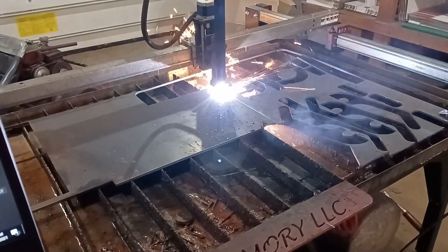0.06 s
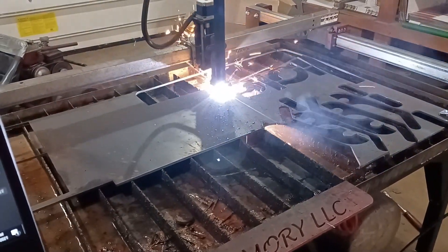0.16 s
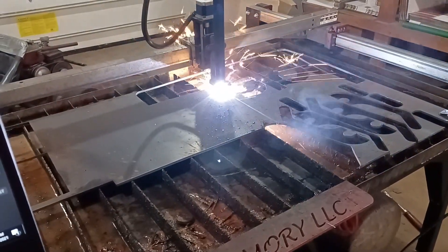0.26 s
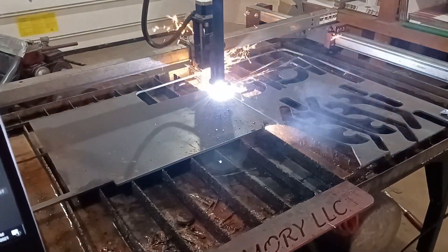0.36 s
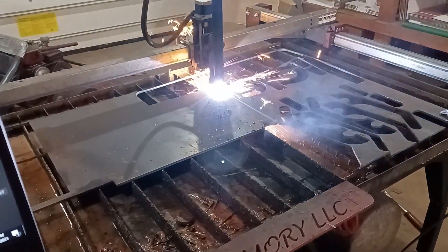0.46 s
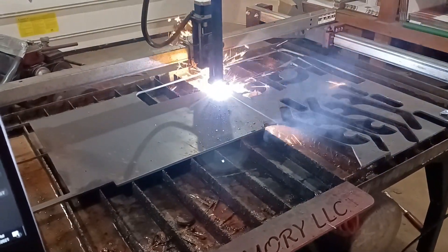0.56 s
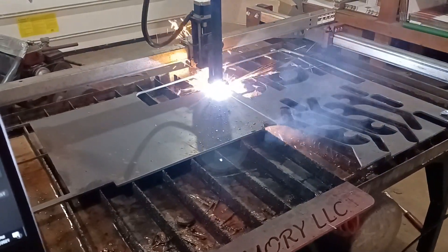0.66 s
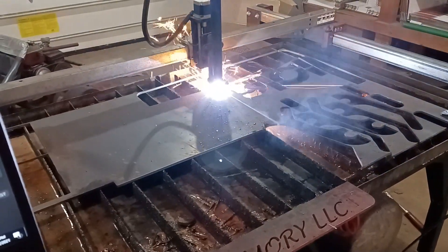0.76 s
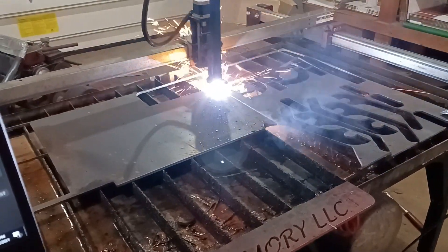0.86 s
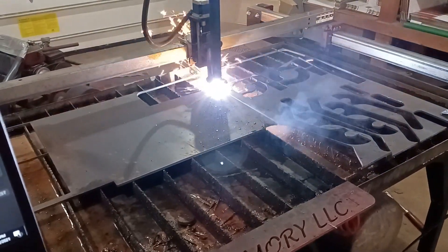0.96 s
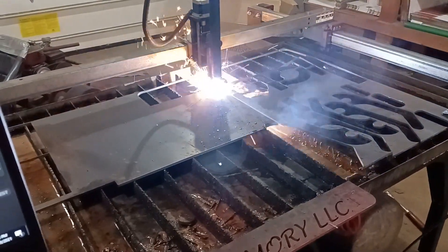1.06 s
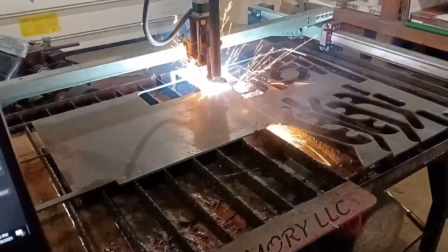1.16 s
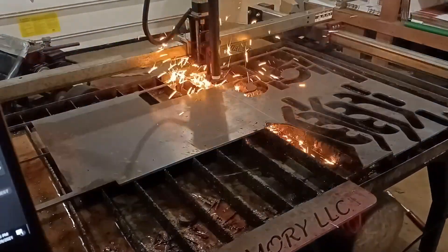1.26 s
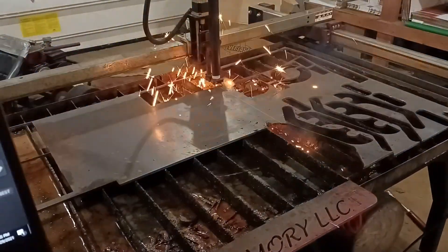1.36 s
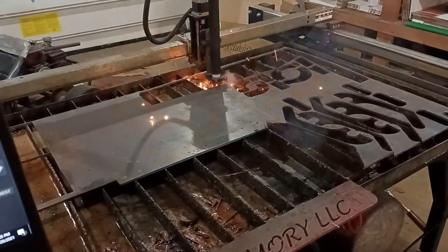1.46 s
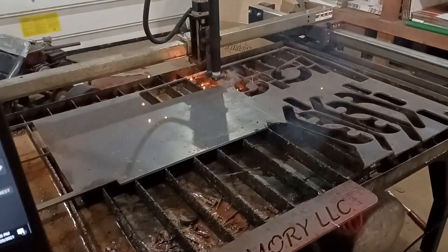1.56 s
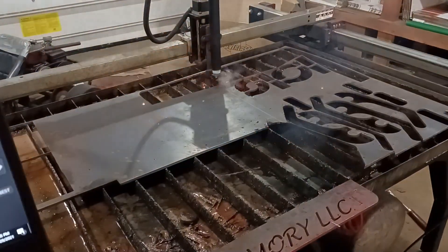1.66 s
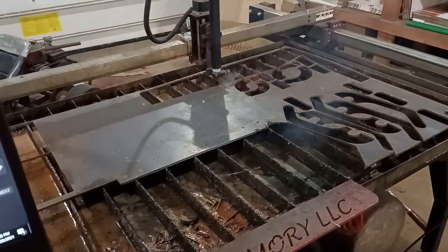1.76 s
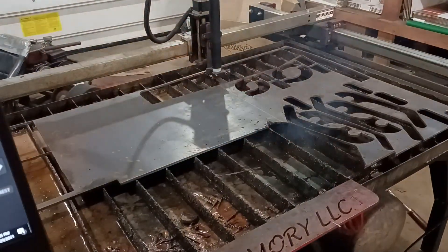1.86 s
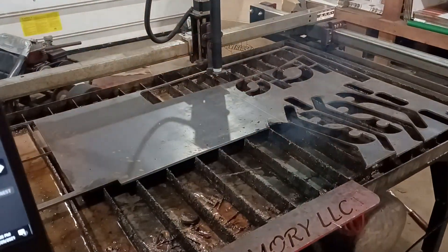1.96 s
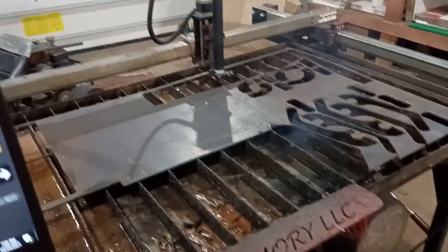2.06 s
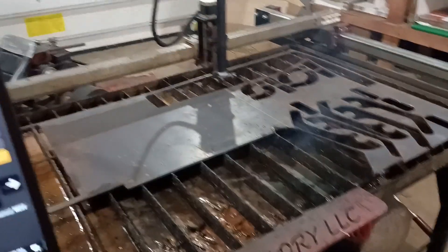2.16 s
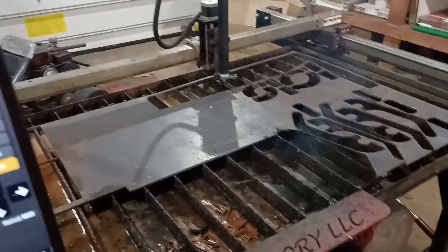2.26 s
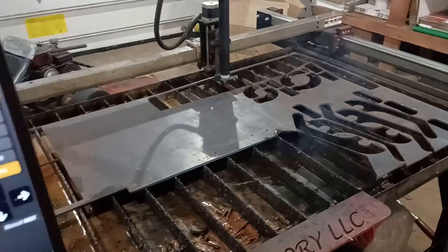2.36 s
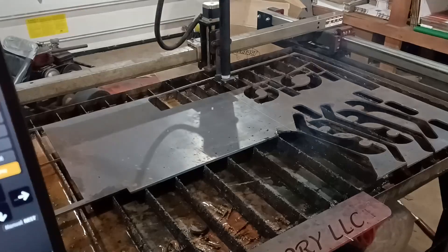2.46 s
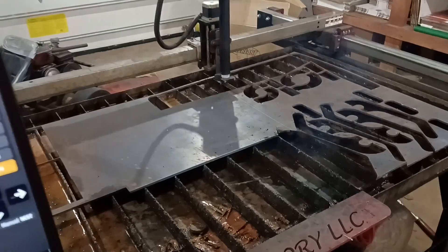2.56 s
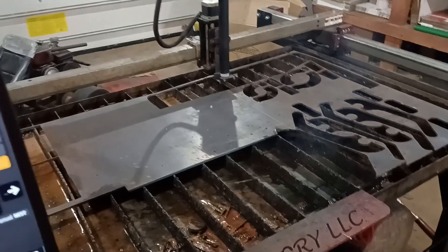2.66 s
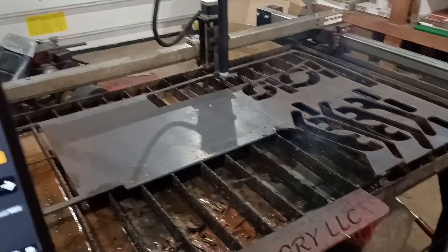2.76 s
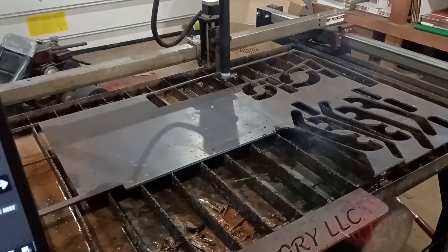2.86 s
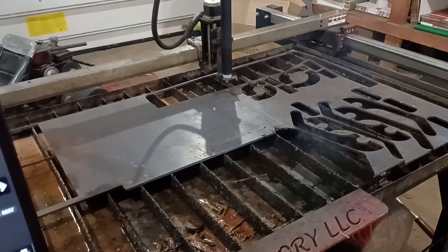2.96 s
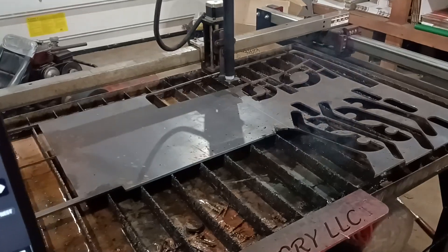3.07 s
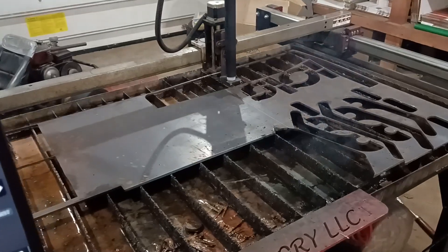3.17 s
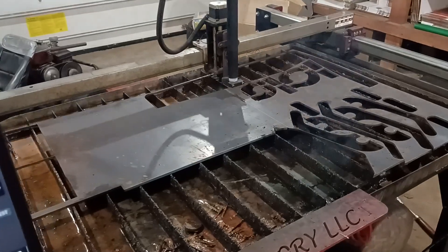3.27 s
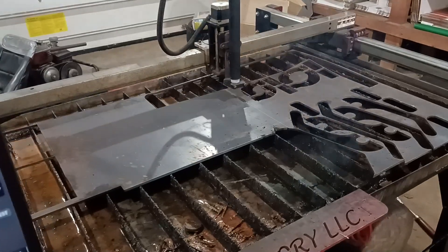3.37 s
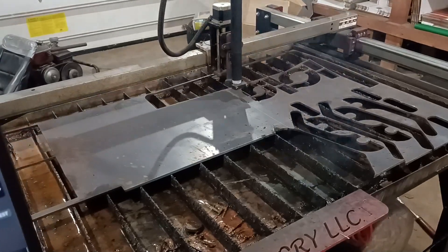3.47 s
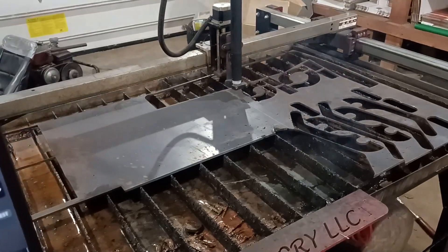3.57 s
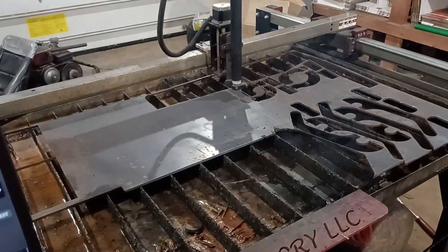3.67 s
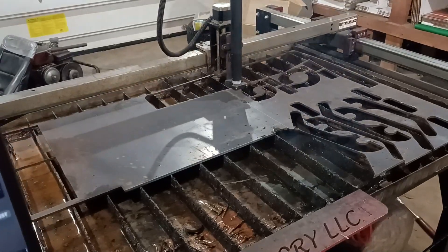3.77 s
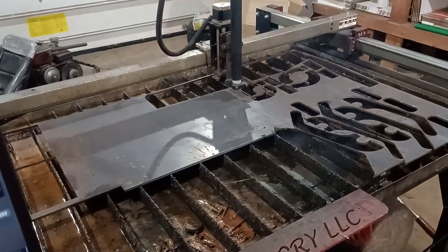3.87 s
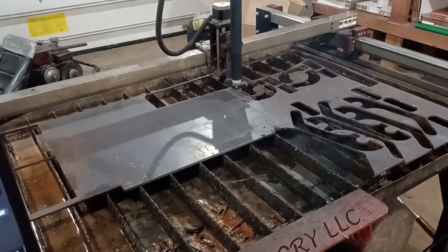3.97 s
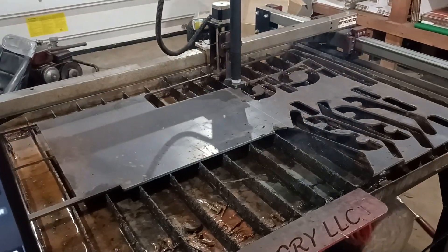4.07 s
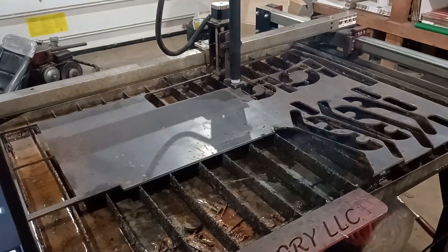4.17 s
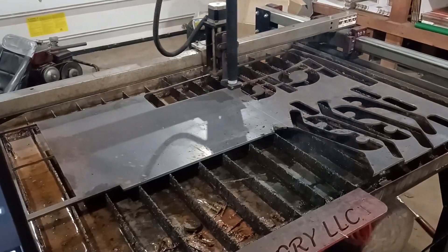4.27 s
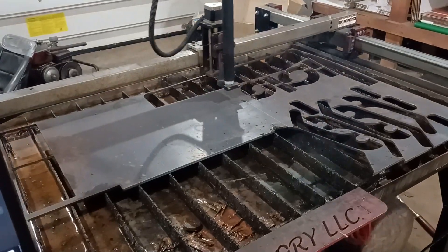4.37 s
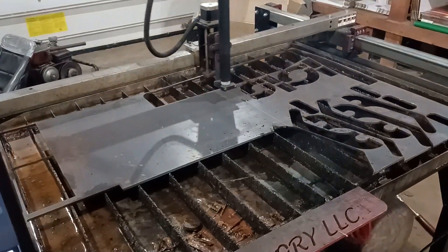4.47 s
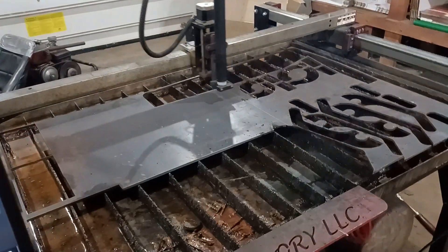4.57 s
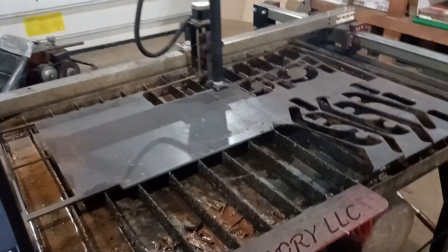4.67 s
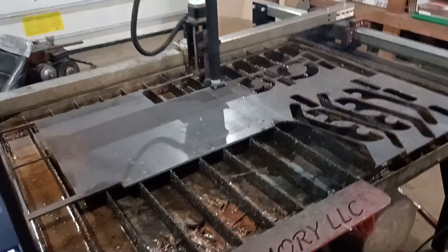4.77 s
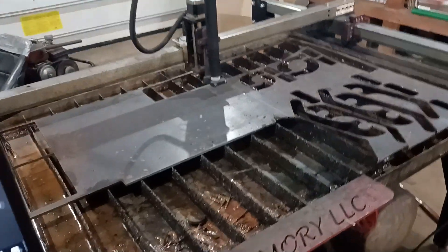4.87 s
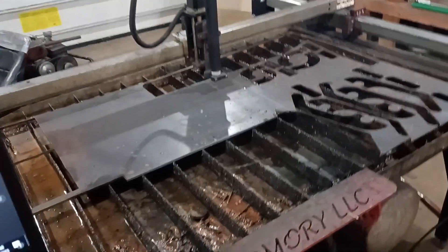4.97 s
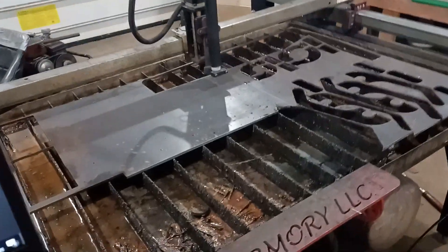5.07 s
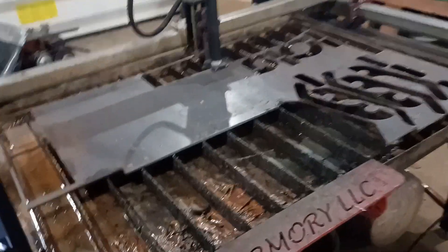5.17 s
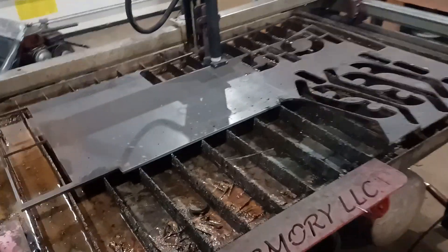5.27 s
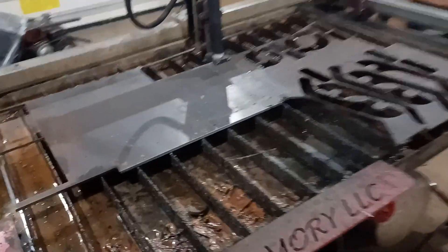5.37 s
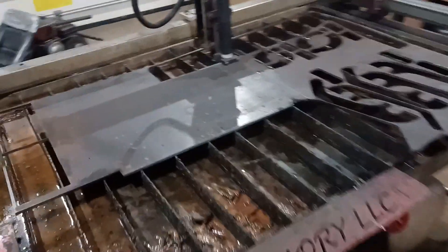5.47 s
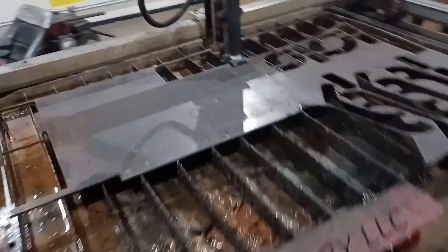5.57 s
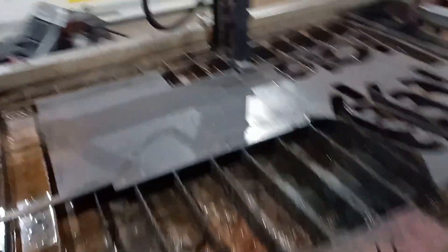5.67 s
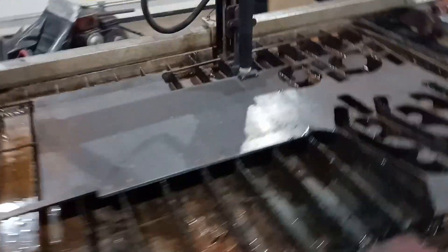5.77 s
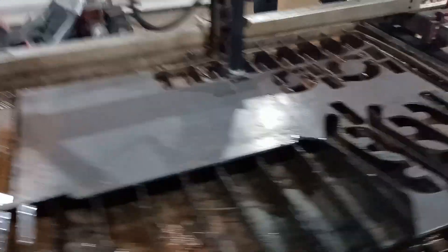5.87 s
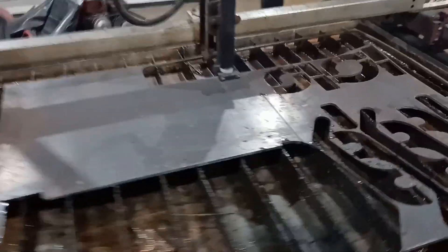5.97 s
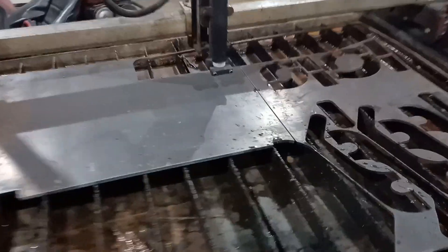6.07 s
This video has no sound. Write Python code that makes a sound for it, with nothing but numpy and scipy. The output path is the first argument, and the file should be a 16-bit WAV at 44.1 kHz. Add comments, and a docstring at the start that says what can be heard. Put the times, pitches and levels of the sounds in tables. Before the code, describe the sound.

In a workshop with a steadily humming, rumbling fan, a nearby plasma cutter gives a loud, harsh hiss that ends in a sputtering pop. A softer rush of air follows, with a faint rasp from the moving carriage and a hollow roar that swells as the jet reaches the steel plate. A motor lowers the torch with a short, throbbing whine, and the hiss turns slightly brighter as the microphone turns.

```python
"""A plasma torch hisses through a steel plate while a workshop fan hums and rumbles throughout.
The arc flares and goes out with a pop. The torch lifts and its carriage rasps as it sets off; cooling
air keeps hissing from the nozzle and roars over the table's open slats. The recorder's gain, turned
down by the loud arc, comes back about a second after it. The jet swells as it meets the plate again,
a whining stepper motor lowers the torch, and at last the listener turns from the fan to the plate."""
import sys
import numpy as np
from scipy import signal
from scipy.fft import rfft, irfft
from scipy.io import wavfile
from scipy.ndimage import uniform_filter1d

SR = 44100
rng = np.random.default_rng(int(sys.argv[2]) if len(sys.argv) > 2 else 0)


def master(y):
    """Save y as 16-bit WAV."""
    cut = np.clip(np.atleast_2d(y).T, -1, 1)
    pcm = np.round(cut * 32767)  # scale
    wavfile.write(sys.argv[1], SR, pcm.astype(np.int16))


N = 269451
TIME = np.arange(N) / SR
FREQS = np.maximum(np.arange(N // 2 + 1) * SR / N, 1)

ARC_OUT_S = 1.189
LIFT_S, LIFT_TAKES_S = 1.34, 0.4   # the torch rises off the cut
SLATS_S, PLATE_S = 1.74, 2.875   # it travels over the open slats, then back onto the plate
LOWER_S, LOWER_TAKES_S = 4.27, 0.31   # it sinks toward the next cut
TURN_S, TURN_TAKES_S = 5.06, 0.96   # the listener turns from the fan toward the plate

# How strong each noise is from low to high pitch: pitch_hz, relative_level_db
FAN_SPECTRUM = [(20, -17), (50, -30), (80, -17), (120, -4), (148, -4.5), (157, 6), (166, -8), (180, -1),
                (220, 2.6), (255, 0), (325, -3.5), (390, -11), (450, -16.5), (560, -8.5), (800, -21),
                (1500, -31)]   # air moved by the fan
HOLLOW_SPECTRUM = [(300, -4), (620, -12.5), (900, 0.1), (1300, -1.5), (1600, 0), (1800, 0.5), (2100, -5),
                   (3000, -8.5), (5000, -13)]   # hollow part of the jet's roar
BRIGHT_SPECTRUM = [(1500, -5.5), (2250, -4), (2540, -1), (2830, -1), (3200, -9), (3600, -8.5), (3830, -3),
                   (4400, -11), (7000, -17)]   # bright part of that roar
RUSH_SPECTRUM = [(500, -5.5), (1000, -13.5), (2000, -19), (3000, -6), (4500, -1), (5800, 2), (7100, 4.5),
                 (7900, -2.5), (9000, -3.5), (11000, -5.5)]   # broad rush of cooling air
SIZZLE_SPECTRUM = [(7000, -67), (9000, -25.5), (10000, -9.5), (11200, 0.5), (12200, 4.5), (14000, 6),
                   (16000, 4.5)]   # fine sizzle at the nozzle
BOUNCE_SPECTRUM = [(4000, -33), (5000, -6.5), (5700, 6), (7200, 7), (7900, -11), (9500, -20), (10600, 1),
                   (12300, 2), (13200, -1), (16000, -3)]   # hiss bouncing off the plate
ARC_SPECTRUM = [(110, -21), (250, -2), (500, -12), (1000, -9.5), (2050, -11), (3100, -5.5), (5000, -4.5),
                (6700, -4), (7900, -10), (9700, -8.5), (10800, -3), (12200, -0.5), (13500, 0.3),
                (16000, -0.1)]   # the cutting jet
GUST_SPECTRUM = [(45, -26), (72, -10), (130, 3), (220, -2.5), (350, 2), (600, -3.5), (1100, -5.5),
                 (1600, -10), (2500, -7), (3300, -35), (5400, -6), (8000, -13.5)]   # dull gust after a pop
# Echoes from nearby surfaces: left_delay_s, right_delay_s, level_db
ROOM_ECHOES = [(.0063, 0.0051, -18.5), (0.0115, 0.016, -14), (0.0178, 0.019, -20.5), (.0313, .0291, -30)]
# How alike the two ears hear a noise (1 is fully alike): pitch_hz, likeness
EAR_LIKENESS = [(30, .6), (70, 0.91), (120, 1), (300, 0.96), (550, 0.47), (1500, 0.45), (3000, 0.58),
                (5000, 0.4), (7000, 0.4), (9500, 0.31), (12500, 0.22), (16000, 0.22)]
# Which side is louder: pitch_hz, left_minus_right_db
EAR_BALANCE = [(100, 0.1), (600, -0.6), (1200, 2), (3000, 0.8), (5000, -2), (7000, 0.8), (9500, -1.5),
               (12300, -4.5), (15000, -0.8)]
# Ringing of the hollow under the plate, between the slats: pitch_hz, width_hz, boost_db
HOLLOW_RESONANCES = [(535, 37, 5), (706, 52, 6.5), (838, 50, 5), (901, 13, 7), (987, 19, 7.5),
                     (1130, 45, 7), (1197, 13, 6), (1417, 41, 5), (1628, 23, 7.5), (1690, 25, 1)]
# The jet crosses an edge of the steel: time_s, swell_db
EDGE_CROSSINGS = [(2.874, 7.5), (4.234, 0.5)]
# Loudness of the nozzle's sizzle over time: time_s, level_db
SIZZLE_LEVELS = [(1.19, -50), (1.4, -34.5), (2.25, -27.5), (2.9, -29), (3.55, -27.5), (4.2, -28),
                 (4.72, -31), (5.1, -29), (5.35, -30.5), (5.68, -27), (5.82, -27), (6.11, -29)]
# The arc flares as the cut breaks through: start_s, step_up_db
ARC_FLARES = [(0.954, 1.85), (1.12, 1.4)]
# The arc sputters and blows out: start_s, crack_db, gust_db
ARC_POPS = [(1.135, -38.5, -33), (1.1927, -10.5, -20.5), (1.2088, -15.5, -31), (1.2415, -21, -24)]
# Notes of the table knocked by a pop: pitch_hz, relative_level_db, fade_s (time to fall 60 dB)
TABLE_NOTES = [(137, -10.5, 0.11), (206, -1, 0.066), (402, -37, .06)]


def from_db(db):
    """Turn decibels into a gain to multiply by."""
    return 10 ** (np.asarray(db) / 20)


def ramp(start_s, takes_s):
    """Go from 0 to 1 at an even pace."""
    return np.clip((TIME - start_s) / max(takes_s, 1 / SR), 0, 1)


def over_freqs(points):
    """Read a table at every frequency, along a musical (log) pitch scale."""
    hz, value = np.transpose(points)
    return np.interp(np.log(FREQS), np.log(hz), value)


def colour(points):
    """Gain per frequency, falling away beyond the ends of the table."""
    skirts = np.minimum(FREQS / points[0][0], 1) * np.minimum(points[-1][0] / FREQS, 1)
    return from_db(over_freqs(points)) * skirts ** 2


def band(pitch_hz, half_width_hz, steepness=2):
    """A hump of height 1 around one pitch."""
    return 1 / (1 + ((FREQS - pitch_hz) / half_width_hz) ** steepness)


def white(count):
    """Spectra of unrelated white noises."""
    return rng.standard_normal((count, len(FREQS))) + 1j * rng.standard_normal((count, len(FREQS)))


def drift(rate_hz):
    """A slow random wobble with a typical size of 1."""
    wobble = irfft(white(count=1)[0] * band(0, rate_hz), N)
    return wobble / np.sqrt(np.mean(wobble ** 2))


def delay(seconds):
    """Multiply a spectrum by this to make its sound arrive later."""
    return np.exp(-2j * np.pi * FREQS * seconds)


def turbulence(gain, lag_s=0):
    """Stereo noise of swirling air, shaped by gain, at a standard level; lag_s delays the right side."""
    shared, spread = white(count=2)
    alike = np.clip(over_freqs(EAR_LIKENESS), -1, 1)
    shared, spread = shared * np.sqrt(1 + alike), spread * np.sqrt(1 - alike)
    noise = irfft(gain * np.array([shared + spread, (shared - spread) * delay(lag_s)]), N)
    return noise / np.std(noise.mean(axis=0))


def workshop():
    """What the room does for each ear: direct sound plus echoes from gantry, floor and walls."""
    echoes = sum(from_db(db) * np.array([delay(left), delay(right)]) for left, right, db in ROOM_ECHOES)
    return (1 + echoes) * from_db(over_freqs(EAR_BALANCE) * np.array([[.5], [-.5]]))


def reverberate(sound, tail_db, fade_s=0.75):
    """Add the workshop's fading wash of echoes."""
    age = TIME[:SR // 2]
    tail = rng.standard_normal((2, len(age))) * from_db(-60 * age / fade_s) * (age > .005)
    tail = tail / np.sqrt(np.sum(tail ** 2, axis=1, keepdims=True))
    return sound + from_db(tail_db) * signal.fftconvolve(sound, tail, axes=1)[:, :N]


def table_hollow():
    """The hollow under the plate boosts the pitches it rings at."""
    return from_db(sum(db * band(hz, width / 2) for hz, width, db in HOLLOW_RESONANCES))


def torch_height():
    """0 down at the plate, 1 at travelling height."""
    return ramp(LIFT_S, LIFT_TAKES_S) - ramp(LOWER_S, LOWER_TAKES_S)


def fan(room, hum_hz=269.8, hum_db=-31.5, octave_db=-32, rumble_db=-37, on_plate_db=1.5, turned_db=-2):
    """The blades hum over a rumble of moving air, which thickens once the jet is on the plate."""
    phase = 2 * np.pi * hum_hz * TIME + 0.041 * drift(rate_hz=5.9)
    tone = np.sqrt(2) * (np.sin(phase) + from_db(octave_db) * np.sin(2 * phase))
    lean_left = from_db([[0.75], [-0.75]])
    hum = tone * from_db(hum_db + .8 * drift(rate_hz=9)) * lean_left
    rumble = turbulence(room * colour(FAN_SPECTRUM))
    rumble *= from_db(rumble_db + on_plate_db * ramp(PLATE_S, 0.18))
    return from_db(turned_db * ramp(TURN_S, TURN_TAKES_S) ** 3) * (hum + rumble)


def carriage(room, level_db=-39):
    """The carriage that carries the torch rasps briefly as it sets off."""
    rasp = turbulence(room * band(pitch_hz=1620, half_width_hz=200, steepness=4))
    return from_db(level_db) * np.sin(np.pi * ramp(start_s=1.52, takes_s=0.73)) * rasp


def stepper(room, start_s=4.3, brake_s=4.785, step_hz=1992, turns_hz=19.6, mount_hz=1990):
    """The lift motor whines at its step rate, throbs with each turn of its screw and brakes to a stop."""
    speed = ramp(start_s, takes_s=.03) - ramp(brake_s, takes_s=.08)
    phase = 2 * np.pi * np.cumsum(step_hz * speed) / SR + .35 * drift(rate_hz=30)
    throb = 1 + 0.59 * np.cos(2 * np.pi * turns_hz * (TIME - 5))
    flutter = from_db(2.2 * drift(rate_hz=30))
    level = from_db(-42 + 3 * ramp(start_s, brake_s - start_s)) * (speed > 0)
    whine = level * throb * flutter * np.sin(phase)
    # the mount rings along at full speed, so the whine drops away as the motor slows
    mount = 1 / (1 + 1j * (FREQS - mount_hz) / 190)
    return reverberate(irfft(rfft(whine) * mount * room, N), tail_db=-6)


def plate_roar(room, hollow_db=-49, bright_db=-45, slats_db=-13, crossing_s=0.046):
    """The jet roars louder the higher the torch: hollow over the slats, brighter on the plate."""
    height = torch_height()
    over_slats = ramp(SLATS_S - crossing_s, 2 * crossing_s) - ramp(PLATE_S - crossing_s, 2 * crossing_s)
    swell_db = sum(db * np.exp(-((TIME - time_s) / crossing_s) ** 2) for time_s, db in EDGE_CROSSINGS)
    hollow = turbulence(room * table_hollow() * colour(HOLLOW_SPECTRUM), lag_s=-3.3e-5)
    hollow *= from_db(hollow_db + 14 * height)
    bright = turbulence(room * colour(BRIGHT_SPECTRUM))
    bright *= from_db(bright_db + 10 * height ** 3 + slats_db * over_slats)
    return from_db(swell_db + drift(rate_hz=8.8)) * (hollow + bright)


def plate_swish(hiss, echo_db=-17, delay_s=.0004, wander=0.14):
    """An echo off the plate, its path wandering, slowly shifts the tone of a hiss."""
    late_s = delay_s * (1 + wander * drift(rate_hz=1.6))
    return hiss + from_db(echo_db) * np.array([np.interp(TIME - late_s, TIME, side) for side in hiss])


def cooling_air(room, rush_db=-32.5, bounce_db=-31, lip_db=-41.5):
    """Once the arc is out, cold air rushes and sizzles through the nozzle."""
    rush = turbulence(room * colour(RUSH_SPECTRUM), lag_s=1.5e-5)
    rush *= from_db(rush_db + 0.95 * (torch_height() - 0.5)) * np.sqrt(ramp(ARC_OUT_S, 0.61))
    sizzle = turbulence(room * colour(SIZZLE_SPECTRUM), lag_s=2e-5)
    sizzle *= from_db(np.interp(TIME, *np.transpose(SIZZLE_LEVELS))) * (TIME > ARC_OUT_S)
    # hiss bouncing off the plate comes in as the listener turns
    bounce = turbulence(room * colour(BOUNCE_SPECTRUM), lag_s=-8e-6)
    bounce *= from_db(bounce_db) * ramp(TURN_S, TURN_TAKES_S)
    # air catches the lip of the cut during the lift
    lip = turbulence(room * band(pitch_hz=9000, half_width_hz=1200))
    lip *= from_db(lip_db) * np.sin(np.pi * ramp(LIFT_S, LIFT_TAKES_S))
    return rush + sizzle + bounce + lip


def arc(room, level_db=-19.5, cold_db=-28, whistle_db=-37, fade_db_per_s=115, rise_db_per_s=20):
    """The hot jet tears through the steel and whistles in the slot as the cut nears its end."""
    burning = from_db(-fade_db_per_s * np.maximum(TIME - ARC_OUT_S, 0))
    flare = from_db(sum(db * ramp(start_s, 0.022) for start_s, db in ARC_FLARES))
    # cold air keeps the slot hissing until the torch has lifted
    cold = from_db(cold_db) * (1 - ramp(LIFT_S, LIFT_TAKES_S) ** 4)
    level = np.maximum(from_db(level_db) * flare * burning, cold)
    hiss = turbulence(room * table_hollow() * colour(ARC_SPECTRUM), lag_s=3e-5)
    whistle = turbulence(room * band(pitch_hz=1810, half_width_hz=45))
    whistle *= burning * from_db(whistle_db - rise_db_per_s * np.maximum(ARC_OUT_S - TIME, 0))
    flutter = from_db(0.8 * drift(rate_hz=14))
    return level * flutter * hiss + whistle


def pop(room, width_s=0.00023, gust_fade_s=0.48):
    """The hot gas collapses in a short pressure swing that knocks the table and leaves a dull gust."""
    crack, gust_power = np.zeros(N), np.zeros(N)
    for start_s, crack_db, gust_db in ARC_POPS:
        age = np.maximum(TIME - start_s, 0)
        widths = (TIME - start_s) / width_s
        swing = widths * np.exp(np.maximum((1 - widths ** 2) / 2, -60))
        knock = sum(from_db(db - np.minimum(60 * age / fade_s, 300)) * np.cos(2 * np.pi * hz * age)
                    for hz, db, fade_s in TABLE_NOTES)
        push = 1 - np.exp(-age / (2 * width_s))   # the push on the table builds up with the swing
        crack += from_db(crack_db) * (swing + push * knock)
        gust_power += (TIME > start_s) * from_db(gust_db - 60 * age / gust_fade_s) ** 2
    gust = np.sqrt(gust_power) * turbulence(room * colour(GUST_SPECTRUM))
    return reverberate(irfft(rfft(crack) * room, N), tail_db=-17) + gust


def gain_control(sound, loud_db=-19, duck_db=6.5, hold_s=1.07, recover_db_per_s=16):
    """A loud sound turns the gain down one step; it stays there a while afterwards, then creeps back."""
    loud = uniform_filter1d(np.mean(sound ** 2, axis=0), size=SR // 10) > from_db(loud_db) ** 2
    quiet_for_s = TIME - np.maximum.accumulate(np.where(loud, TIME, -np.inf))
    return sound * from_db(-np.clip(duck_db - recover_db_per_s * (quiet_for_s - hold_s), 0, duck_db))


def scene():
    """Torch, motors and fan in one workshop."""
    room = workshop()
    hiss, bang, air = arc(room), pop(room), cooling_air(room)
    return bang + plate_roar(room) + stepper(room) + fan(room) + carriage(room) + plate_swish(hiss + air)


def record(dry, low_cut_hz=42, high_cut_hz=15800):
    """The microphone thins the deep bass, the gain ducks under the arc, and the top treble is cut."""
    thinned = signal.sosfilt(signal.butter(2, low_cut_hz, "high", fs=SR, output="sos"), dry)
    return irfft(rfft(gain_control(thinned)) / np.sqrt(1 + (FREQS / high_cut_hz) ** 400), N)


dry = scene()
out = record(dry)
master(out)
```